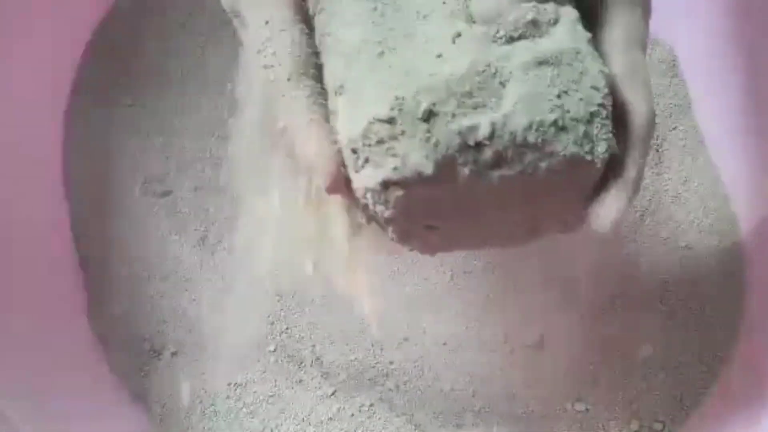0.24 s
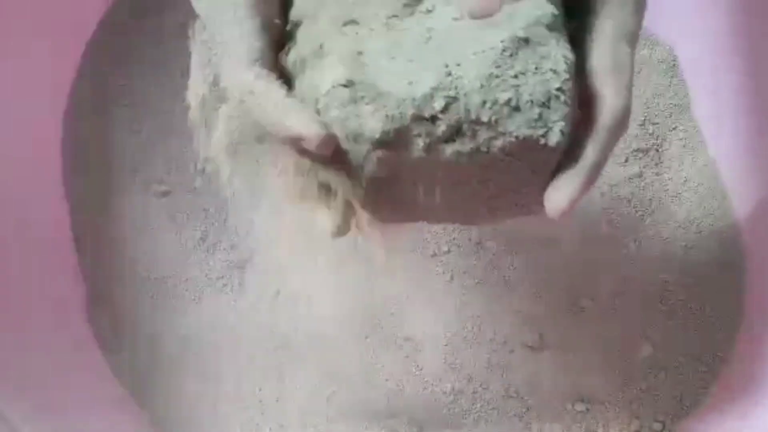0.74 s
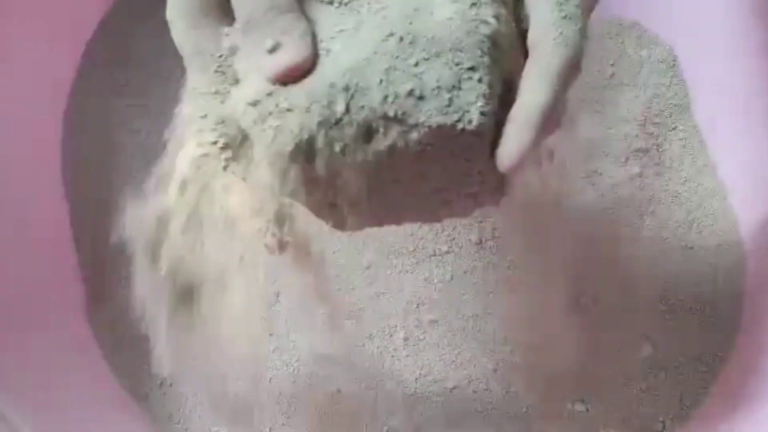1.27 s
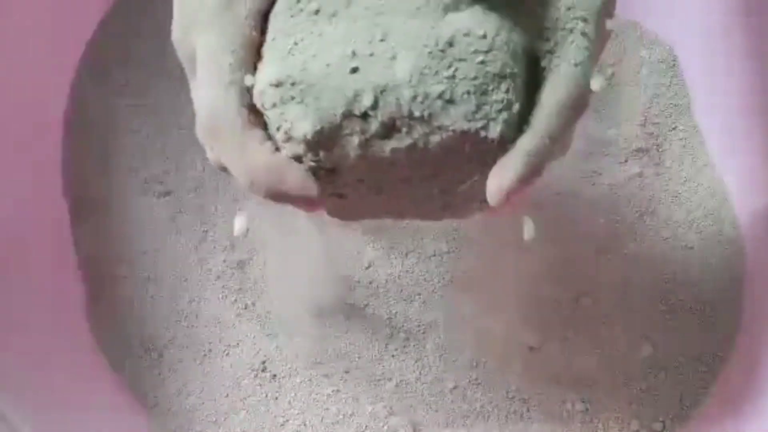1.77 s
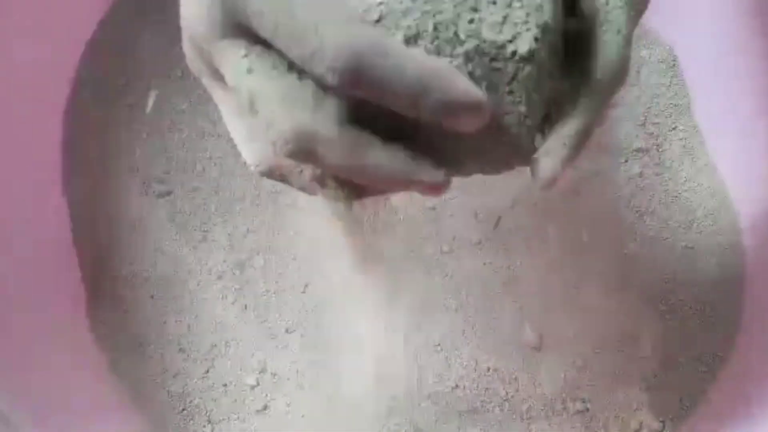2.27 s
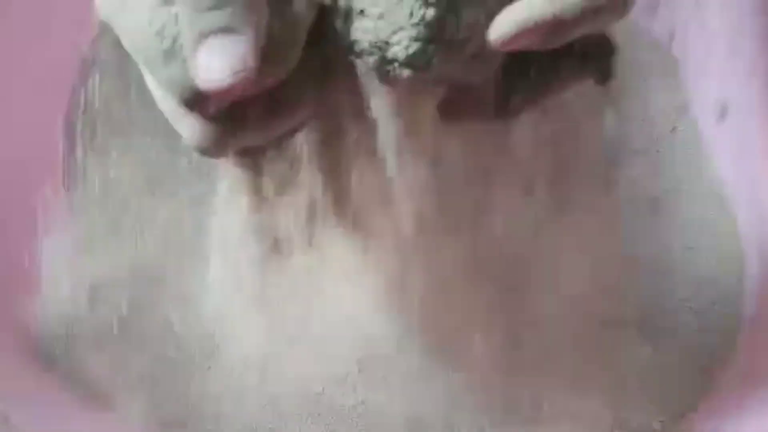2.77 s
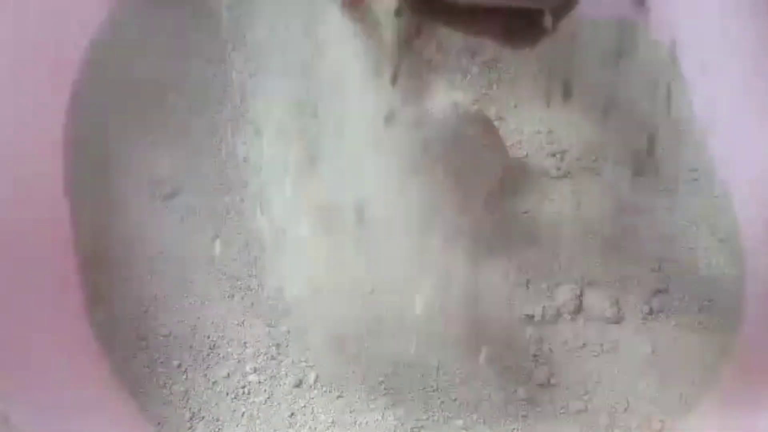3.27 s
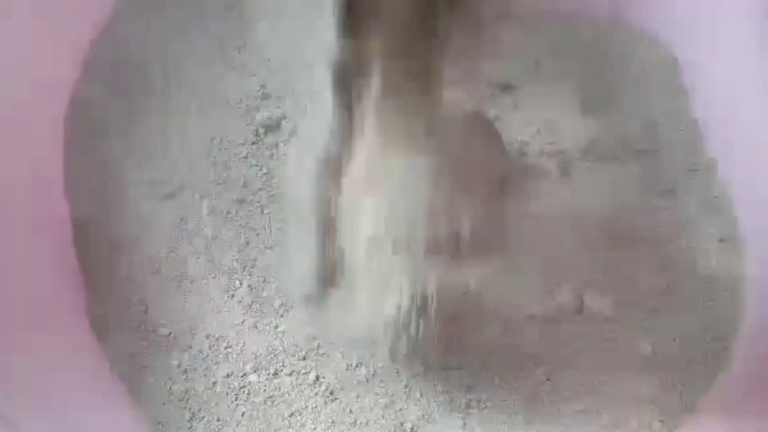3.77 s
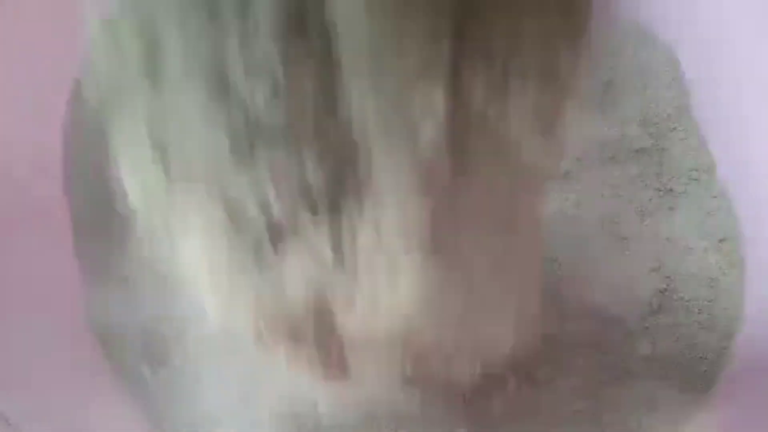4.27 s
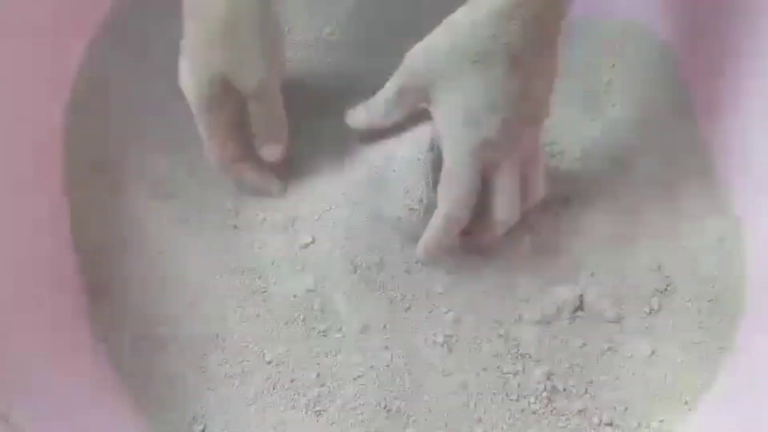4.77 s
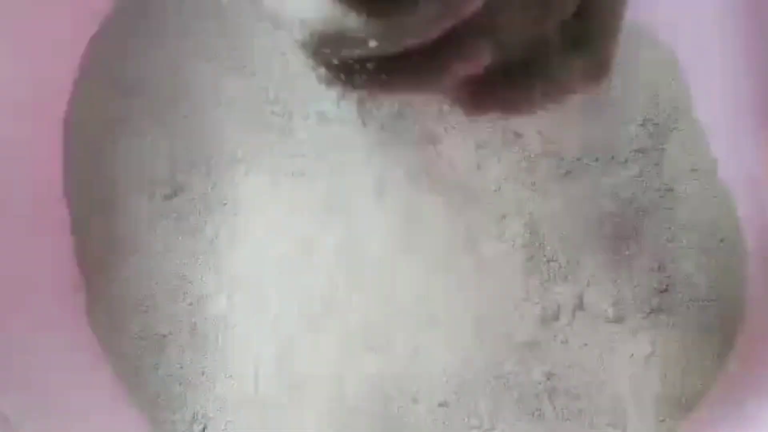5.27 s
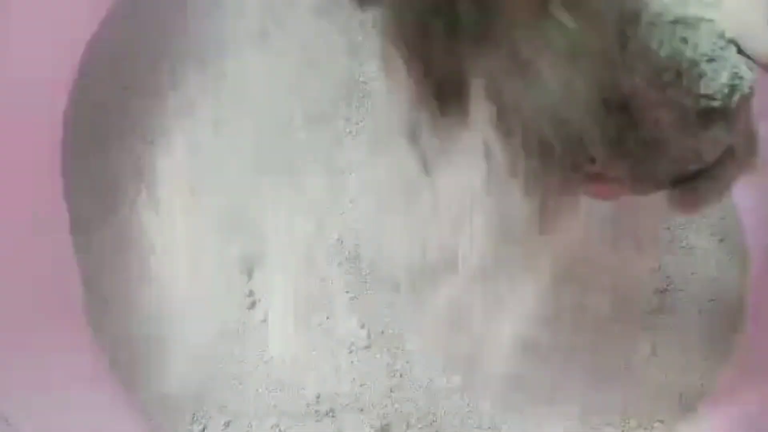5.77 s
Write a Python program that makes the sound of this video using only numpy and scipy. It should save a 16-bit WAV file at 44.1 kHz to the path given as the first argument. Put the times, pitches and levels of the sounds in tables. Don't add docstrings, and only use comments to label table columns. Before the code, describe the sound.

Fingers press a dry sand block, giving short gritty crunches and thin streams of pattering grains. Near three seconds it breaks in a dense cluster of sharp snaps with low thuds that shake the plastic basin. Quieter sifting follows, then another crumbling burst just past four seconds, soft trickling, and final crunches. Very close phone microphone in a small room with faint low hum.

```python
import sys
import numpy as np
from scipy import signal
from scipy.io import wavfile
from scipy.ndimage import uniform_filter1d

SR = 44100
rng = np.random.default_rng(int(sys.argv[2]) if len(sys.argv) > 2 else 0)


def natural_amplitude(level_db):
    exponent = np.asarray(level_db, float) / 20
    return 10 ** exponent


def put_to_file(sound):
    columns = np.atleast_2d(sound).T
    safe = np.clip(columns, -1, 1)
    whole_steps = np.round(safe * 32767)
    wavfile.write(sys.argv[1], SR, whole_steps.astype(np.int16))


N = 266364
HZ = np.fft.rfftfreq(2048, 1 / SR)

# peak time in seconds, grit level in dB, seconds to rise 10 dB,
# seconds to fall 10 dB, block crunch in dB relative to the grit.
SQUEEZES = [(0.0, -43, .05, .11, -11), (.385, -43, .02, .09, 1.5), (.74, -31, .055, .08, -15),
            (.96, -48, .07, .07, -1.5), (1.425, -32, .06, .05, -12), (2.075, -27, .027, .1, -11),
            (2.355, -38, .02, .07, -3), (2.592, -28, .026, .06, -16), (2.73, -33, .03, .03, -12),
            (2.804, -40, .03, .04, 7), (2.905, -36, .05, .06, 2.5), (3.322, -39.5, .1, .045, -16),
            (3.492, -31, .035, .045, -13), (3.7, -43, .25, .33, -8.5), (4.222, -29, .06, .045, -8),
            (4.308, -35, .04, .07, -.4), (5.146, -40.5, .1, .035, -26), (5.466, -36, .05, .08, -3),
            (5.74, -46, .05, .05, 4), (5.795, -32, .03, .045, -1.5), (5.913, -35.5, .03, .1, -11)]
# start in seconds, end in seconds, grit level in dB,
# seconds to fall 10 dB, block crunch in dB relative to the grit.
STREAMS = [(.17, .235, -38.5, .065, -13), (.31, .56, -43.5, .03, -14), (.91, .99, -45, .04, -14),
           (1.08, 1.23, -42, .05, -9), (1.47, 1.66, -40, .17, -6.5), (1.82, 1.91, -39.5, .045, -14),
           (2.25, 2.33, -41.5, .1, -12), (2.42, 2.52, -38, .03, -12), (2.666, 2.9, -32.5, .06, -8.5),
           (3.05, 3.1, -48, .06, -10.5), (3.21, 3.27, -48, .1, -10.5), (4.16, 4.2, -33, .1, -5),
           (4.38, 4.77, -45.5, .03, -8), (4.82, 4.9, -54, .1, -5), (4.92, 4.98, -41.5, .055, -9),
           (5.07, 5.09, -50, .1, -24), (5.23, 5.32, -48.5, .1, -20), (5.37, 5.43, -28, .1, -11),
           (5.63, 5.76, -44.5, .1, -12), (5.97, 6.04, -33.5, .1, -8)]
STREAM_RISE_S = .028
REST_DB, REST_CRUNCH_DB = -55, -69

# time in seconds, grain size in dB.
GRAIN_SIZE = [(0, 1.5), (1.9, 1.5), (2.07, -2.5), (2.3, 2.5), (2.6, .6), (2.9, -1.5), (3.2, 1.5), (3.5, .4),
              (3.8, -.4), (4.0, -3.5), (4.3, -1.5), (4.4, -4.5), (4.77, -4.5), (4.84, 2.5), (5.2, 2.5),
              (5.35, -1.5), (5.58, 3), (5.85, -1.5)]
COARSE_DB, COARSE_PER_CRUNCH, COARSE_PER_FLOW, COARSE_PER_SIZE = 1.5, .4, -.35, .8
FIZZ_DB, FIZZ_PER_FLOW, FIZZ_PER_SIZE = -12.8, .1, -.9
GRAINY_DB, GRAINY_PER_FLOW = 1.2, .13

# time in seconds, snap peak in dB, block knock in dB relative to the snap,
# knock pitch in Hz, coarse grain in dB.
CRACKS = [(.3697, -11, -13, 1070, 13), (.7625, -6, -27, 1240, -4), (1.4079, -1.5, -31, 1450, -1),
          (1.5476, -10.5, -13, 950, 2.5), (2.0267, -14, -22, 1800, 5), (2.0589, -2, -44, 1830, 1.5),
          (2.0766, -3.5, -30, 1000, -4), (2.152, -10.5, -21, 1130, 7), (2.337, 1.5, -22, 1600, -2.5),
          (2.7925, -11, -.4, 816, 7), (2.811, -12, -12, 1120, 5), (2.8546, -5.5, -23, 708, -2.1),
          (2.8918, 1.1, -19.5, 1600, .1), (2.9148, -6.5, -18, 1340, -1), (2.9755, -15, -11, 1120, 5),
          (4.151, -12.5, -5, 1140, -1), (4.1556, -8.5, -14, 1300, 1.1), (4.237, -2.1, -30, 900, -4),
          (4.2941, -6.5, -16.5, 1050, 8), (4.4209, -12.5, -27, 970, -5), (5.4684, -2.5, -13.5, 843, 7.5),
          (5.7864, -9, -12, 1094, 1.1), (5.7898, -4.5, -15.5, 1300, 2.5), (5.8004, -21, -5, 1270, 1.1)]
# time in seconds, snap peak in dB, block knock in dB relative to the snap.
CHIPS = [(.2994, -20.5, -20), (.7316, -14, -28), (1.0673, -27.5, -14.5), (1.5298, -24.5, -9),
         (1.644, -16, -22), (2.0925, -16, -24), (2.2223, -22.5, -15.5), (2.6501, -17, -19),
         (2.7275, -11, -24), (2.7654, -22.5, -17), (2.8734, -11.5, -15), (2.9214, -14, -7.5),
         (3.6526, -21, -21), (3.707, -18.5, -18.5), (3.7623, -23, -17), (4.1175, -22, -19),
         (4.19, -10.5, -17), (4.2134, -13, -16), (4.2424, -7, -15.5), (4.3334, -13, -12), (4.607, -22, -19),
         (4.6787, -26.5, -13), (4.9791, -24.5, -12.5), (5.3525, -13, -19.5), (5.3747, -15, -18.5),
         (5.442, -11, -19), (5.7054, -15, -22), (5.7314, -13, -22), (5.7764, -14, -18), (5.9844, -11, -23)]
CHIP_HZ, CHIP_GRAIN_DB = 950, 1.5
# time in seconds, snap peak in dB.
TICKS = [(.4424, -28), (.7116, -18), (1.494, -12.5), (2.0478, -10.5), (2.0623, -9), (2.1878, -13.5),
         (2.2466, -18), (2.5079, -13), (2.5184, -25), (2.577, -12), (2.6044, -9.5), (2.7, -19),
         (2.8974, -15), (3.298, -19.5), (3.3281, -15), (3.4678, -17), (3.487, -14), (4.1011, -24),
         (4.1969, -8), (4.2044, -15), (4.548, -23), (4.57, -17.5), (4.6258, -17), (4.728, -23),
         (4.7602, -22), (5.2992, -26), (5.3232, -16), (5.682, -23), (5.7658, -11), (5.894, -16)]
TICK_KNOCK_DB, TICK_HZ, TICK_GRAIN_DB = -27, 950, -.4
SPRAY_DB = -25

# frequency in Hz, level in dB.
GRIT_TONE = [(710, -19), (1200, -18.5), (1750, -6), (1980, -8), (3360, -3), (4450, -3.5), (7330, 1),
             (8260, -6), (9720, -31.5), (10600, -26), (11800, -23.5), (12900, -21), (16000, -28.5)]
# frequency in Hz, level in dB.
BLOCK_TONE = [(150, -18.5), (250, -11), (468, -5.5), (562, -3), (801, 0.5), (1250, 1), (1530, -3.5),
              (1660, -3), (2200, -8), (2860, -32), (4840, -120)]

# frequency in Hz, level in dB per Hz.
ROOM_TONE = [(15, -42), (25, -15), (76, 2), (102, 9.5), (211, 2.5), (278, -10), (393, -6.5), (435, -4),
             (482, -3.5), (800, -20.5), (1040, -32), (1760, -120)]
ROOM_DB = -53.5
# start in seconds, end in seconds, level in dB.
STREET = [
    (1.42, 1.68, -47),
    (2.15, 2.19, -52),
    (2.6, 3.02, -50),
    (3.7, 3.85, -53),
    (4.2, 4.98, -48.5),
    (5.32, 6.04, -49.5),
]
STREET_LULL_DB, PASS_S = -64, .07
# start in seconds, end in seconds, pitch in Hz, level in dB.
DRONES = [
    (0.95, 1.205, 546, -54.5),
    (3.68, 3.937, 243.5, -55),
    (4.78, 4.96, 520, -58),
]

# time in seconds, peak in dB, basin pitch in Hz, decay by 60 dB in seconds.
THUDS = [
    (1.431, -39.5, 148, 0.15),
    (1.544, -40, 400, 0.08),
    (2.643, -24.5, 169, 0.11),
    (2.677, -26.5, 196, 0.089),
    (2.73, -35, 121, 0.08),
    (2.792, -20.5, 241, 0.086),
    (2.84, -32, 214, 0.09),
    (3.759, -22.5, 235, 0.037),
    (4.145, -38, 412, 0.033),
    (5.581, -31, 244, 0.031),
]
# time in seconds, level in dB, pitch in Hz,
# decay by 60 dB in seconds.
SHOVES = [
    (2.665, -36, 60, 0.14),
    (2.7, -40, 75, .1),
]
# delay in seconds, level in dB.
WALLS = [
    (.0014, -24.5),
    (.0025, -22.5),
    (.0047, -20.5),
    (.0072, -38),
]


def read(points, hz):
    f, value = np.transpose(points)
    return np.interp(np.log(hz + 1), np.log(f + 1), value)


def evened(x):
    return x / np.sqrt(np.mean(x ** 2) + 1e-20)


def add(mix, s, sound):
    part = mix[max(round(s * SR), 0):][:len(sound)]
    part += sound[:len(part)]


def butter(x, order, hz, kind):
    return signal.lfilter(*signal.butter(order, hz, kind, fs=SR), x)


def colour(x, db):
    log_gain = np.log(natural_amplitude(np.maximum(db, -100)))
    circle = np.concatenate([log_gain, log_gain[-2:0:-1]])
    taps = np.fft.ifft(np.exp(np.conj(signal.hilbert(circle)))).real
    return signal.oaconvolve(x, taps / np.linalg.norm(taps))[:N]


def ring(t, hz, t60):
    return natural_amplitude(-60 * t / t60) * np.sin(2 * np.pi * hz * t) * (1 - np.exp(-t * hz * 3))


def swells(rows, rest_db):
    now = np.arange(0, N + 64, 64) / SR
    start, end, db, rise, fall = np.transpose(rows)[:, :, None]
    db = db - 10 * np.maximum(start - now, 0) / rise - 10 * np.maximum(now - end, 0) / fall
    power = (natural_amplitude(db) ** 2).sum(0) + natural_amplitude(rest_db) ** 2
    return np.interp(np.arange(N) / SR, now, 10 * np.log10(power))


def grains(per_s, spread_db, clump_db, clump_s):
    hit = rng.random(N) < per_s / SR
    big = np.minimum(rng.exponential(1, N), 4.5)
    clump = evened(uniform_filter1d(rng.standard_normal(N), size=max(round(clump_s * SR), 1)))
    x = hit * rng.standard_normal(N) * natural_amplitude(spread_db * big + clump_db * clump)
    return x / np.sqrt(uniform_filter1d(x ** 2, size=3000) + 1e-12)


def coarser(x, db):
    return x + (natural_amplitude(db) - 1) * butter(x, 1, 3000, "low")


def hands():
    moves = [(s, s, db, up, down, rel) for s, db, up, down, rel in SQUEEZES]
    moves += [(a, b, db, STREAM_RISE_S, down, rel) for a, b, db, down, rel in STREAMS]
    crunch = [(a, b, db + rel, up, down) for a, b, db, up, down, rel in moves]
    return swells([m[:-1] for m in moves], REST_DB), swells(crunch, REST_CRUNCH_DB)


def slipping_grains(flow_db, coarse_db, grainy_db):
    clicks = grains(12000, np.clip(grainy_db, 0, 8), 1.27, 0.0059) * natural_amplitude(flow_db)
    pings = grains(500, 2.5, 1.6, 0.0051) * natural_amplitude(flow_db - 14.5 + grainy_db)
    return coarser(clicks, coarse_db) + butter(pings, 1, [5500, 8200], "band")


def snap_and_spray(t, a, b):
    splinters = natural_amplitude(SPRAY_DB + 6) * (t < .0055) * (1 - 120 * t)
    snap = a * (0.17 * natural_amplitude(-60 * t / 0.0011) + splinters)
    snap[0] = 1.9
    patter = b * natural_amplitude(4.5 * evened(uniform_filter1d(a, size=30)) - 8)
    spill = natural_amplitude(SPRAY_DB - 60 * t / 0.032) * (1 - np.exp(-t / 0.00033))
    return snap + patter * spill


def block_knock(t, hz, noise):
    knock = ring(t, hz, 0.013) + 0.67 * ring(t, hz * 1.346, 0.0063)
    knock += 0.17 * ring(t, hz * .66, 0.05) + 0.26 * ring(t, hz * 0.52, 0.011)
    knock += 0.22 * ring(t, hz * 1.95, 0.0069)
    settle = evened(butter(noise, 2, [hz * 0.61, hz * 1.3], "band"))
    return knock + natural_amplitude(-20.5 - 60 * t / .12) * settle * (1 - np.exp(-t / 0.001))


def breaks():
    rows = CRACKS + [(*c, CHIP_HZ, CHIP_GRAIN_DB) for c in CHIPS]
    rows += [(*c, TICK_KNOCK_DB, TICK_HZ, TICK_GRAIN_DB) for c in TICKS]
    snaps, knocks = np.zeros((2, N))
    t = np.arange(5000) / SR
    chance = rng.standard_normal((len(rows), 3, len(t)))
    for (at, snap_db, knock_db, hz, grain_db), (a, b, c) in zip(rows, chance):
        snap = coarser(snap_and_spray(t, a, b), grain_db)
        add(snaps, at + .0012, natural_amplitude(snap_db - 1.5) * snap)
        add(knocks, at + 0.00093, natural_amplitude(snap_db + knock_db + 7.5) * block_knock(t, hz, c))
    return snaps, butter(knocks, 2, 330, "high")


def sand():
    flow_db, crunch_db = hands()
    rush = flow_db - flow_db.mean()
    size_db = np.interp(np.arange(N) / SR, *np.transpose(GRAIN_SIZE))
    give = crunch_db - crunch_db.mean() - rush
    coarse_db = COARSE_DB + COARSE_PER_CRUNCH * give + COARSE_PER_FLOW * rush + COARSE_PER_SIZE * size_db
    fizz_db = FIZZ_DB + FIZZ_PER_FLOW * rush + FIZZ_PER_SIZE * size_db
    slips = slipping_grains(flow_db, coarse_db, GRAINY_DB + GRAINY_PER_FLOW * rush)
    snaps, knocks = breaks()
    fine = HZ > 9600
    tone = read(GRIT_TONE, HZ) - 12 * np.maximum(np.log2(700 / (HZ + 1)), 0)
    tone -= 40 * (HZ > 15850)
    grit = colour(slips + snaps, np.where(fine, tone - 60, tone))
    fizz = (slips + natural_amplitude(-2.5) * snaps) * natural_amplitude(fizz_db - 3.5)
    fizz = colour(fizz, np.where(fine, tone, tone - 80))
    crunch = grains(3000, 3.3, 2.1, 0.0087) * natural_amplitude(crunch_db)
    crunch = colour(crunch, read(BLOCK_TONE, HZ) - 30 * (HZ < 150))
    return grit + knocks + crunch, fizz


def basin_echoes(dry):
    t = np.arange(5000) / SR
    echo = rng.choice([-1., 1.], len(t)) * (rng.random(len(t)) < .05) * natural_amplitude(-60 * t / 0.12) * (t > .008)
    echo *= natural_amplitude(-10.5) / np.linalg.norm(echo)
    for s, db in WALLS:
        echo[round(s * SR)] = natural_amplitude(db)
    return butter(signal.oaconvolve(dry, echo)[:N], 1, 6000, "low")


def room():
    swell_db = evened(uniform_filter1d(rng.standard_normal(N), size=6000))
    out = natural_amplitude(ROOM_DB + swell_db) * colour(rng.standard_normal(N), read(ROOM_TONE, HZ))
    murmur = evened(butter(rng.standard_normal(N), 2, [240, 520], "band"))
    street_db = swells([(a, b, db, PASS_S, PASS_S) for a, b, db in STREET], STREET_LULL_DB)
    out += natural_amplitude(street_db - 7.5) * murmur
    for start, end, hz, db in DRONES:
        t = np.arange(0, end - start, 1 / SR)
        add(out, start, natural_amplitude(db) * np.sin(2 * np.pi * hz * t) * signal.windows.tukey(len(t), .5))
    return out


def thuds():
    out, t = np.zeros(N), np.arange(8000) / SR
    chance = rng.standard_normal((len(THUDS), len(t)))
    for (at, db, hz, t60), noise in zip(THUDS, chance):
        scatter = evened(butter(noise, 2, [110, 380], "band"))
        fade = natural_amplitude(-60 * t / (1.67 * t60)) * (1 - np.exp(-t / 0.0013))
        add(out, at + 0.00302, natural_amplitude(db + 1.5) * (-ring(t, hz, t60) + .3 * scatter * fade))
    return out


def rocking_basin():
    out, t = np.zeros(N), np.arange(5000) / SR
    for at, db, hz, t60 in SHOVES:
        add(out, at, natural_amplitude(db) * ring(t, hz, t60))
    return out


def scene():
    body, fizz = sand()
    dry = body + fizz + thuds() + rocking_basin()
    wet = basin_echoes(dry)
    side = natural_amplitude(-13) * fizz * np.sign(uniform_filter1d(rng.standard_normal(N), size=8))
    side = colour(side, np.where((HZ > 9000) & (HZ < 15800), 0, -70))
    return dry + wet + room() + np.array([side, -side])


def treble_dropouts(x, margin_db=2.0, luck_db=4.0):
    hz, _, z = signal.stft(x, SR, nperseg=2048, noverlap=1024)
    edges = np.searchsorted(hz, np.arange(9000, 17500, 690))
    power = np.add.reduceat((abs(z) ** 2).mean(0), edges, axis=0)[:-1]
    loud_db = 10 * np.log10((abs(z) ** 2).mean((0, 1)) + 1e-16)
    level_db = 10 * np.log10(power + 1e-16) - .85 * loud_db
    luck = uniform_filter1d(rng.standard_normal(power.shape), size=3, axis=1)
    luck = evened(uniform_filter1d(luck, size=2, axis=0))
    floor_db = np.percentile(level_db, 25, axis=1, keepdims=True) - margin_db
    blank = level_db + luck_db * luck < floor_db
    z[:, edges[0]:edges[-1]] *= np.repeat(~blank, np.diff(edges), axis=0)
    return signal.istft(z, SR, nperseg=2048, noverlap=1024)[1][:, :N]


def band_limit(x):
    return signal.sosfilt(signal.butter(12, 16860, fs=SR, output="sos"), x)


def record(dry):
    limited = 1.15 * np.tanh(dry / 1.15)
    edge = signal.firwin(255, 16300, fs=SR)[None]
    mix = signal.oaconvolve(treble_dropouts(limited), edge, "same")
    return band_limit(mix)


dry = scene()
out = record(dry)
put_to_file(out)
```